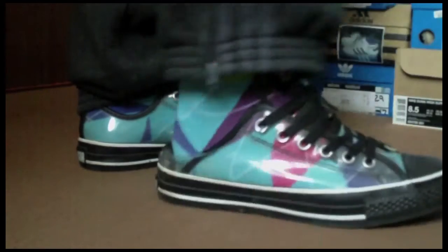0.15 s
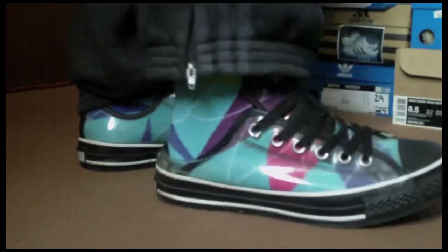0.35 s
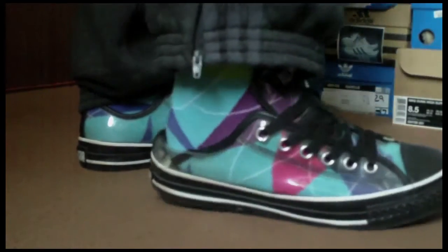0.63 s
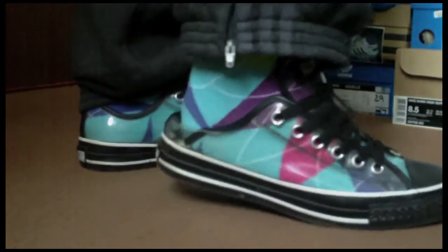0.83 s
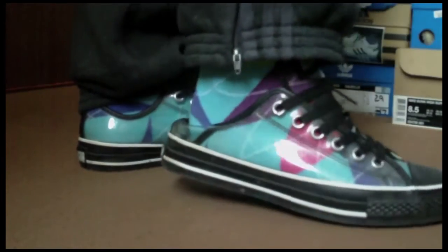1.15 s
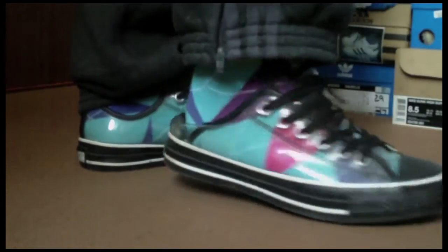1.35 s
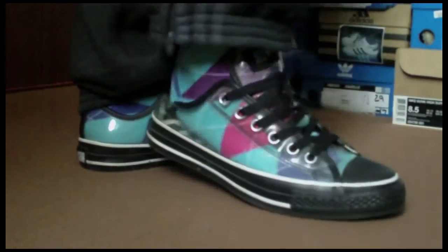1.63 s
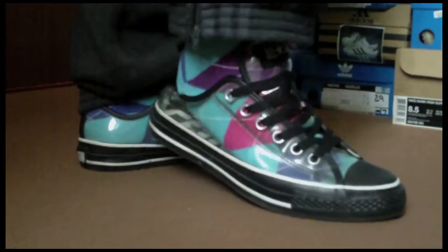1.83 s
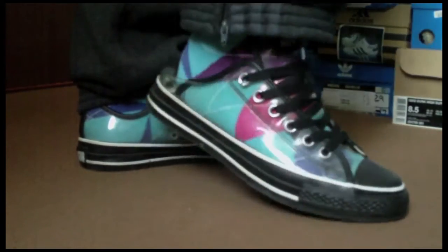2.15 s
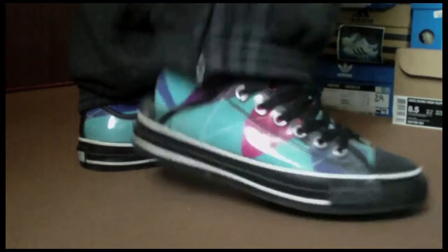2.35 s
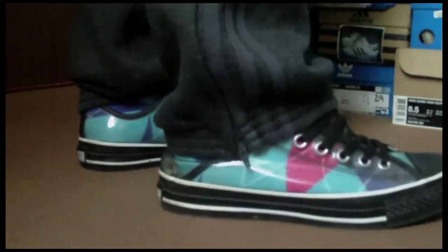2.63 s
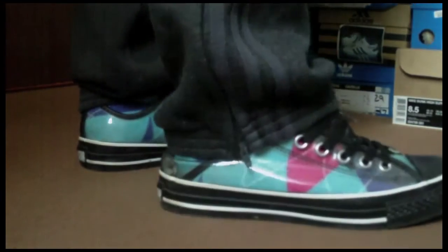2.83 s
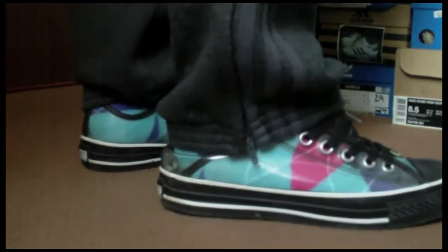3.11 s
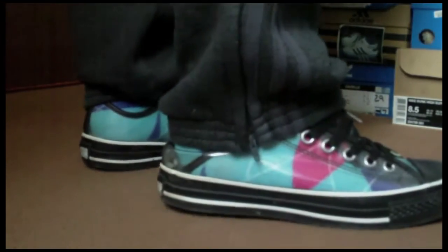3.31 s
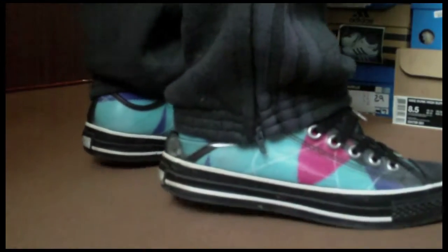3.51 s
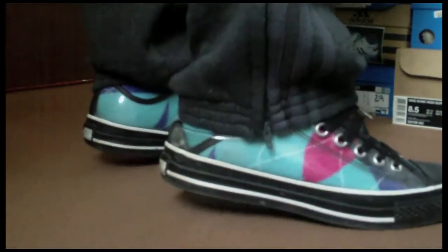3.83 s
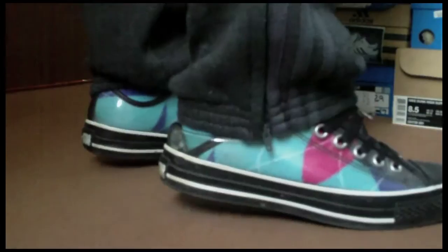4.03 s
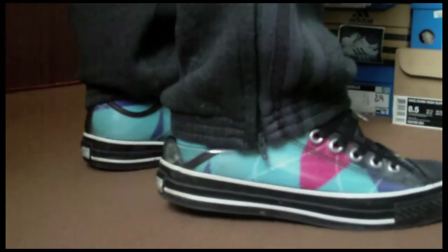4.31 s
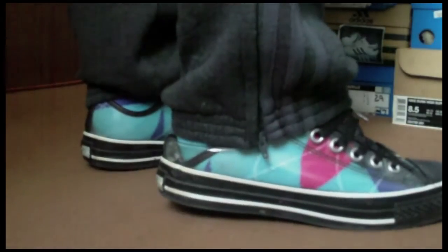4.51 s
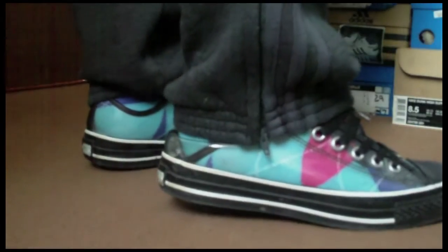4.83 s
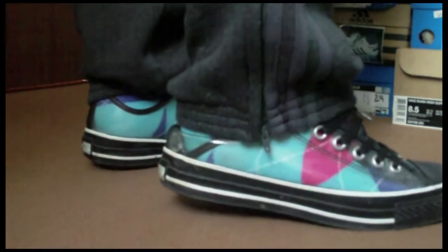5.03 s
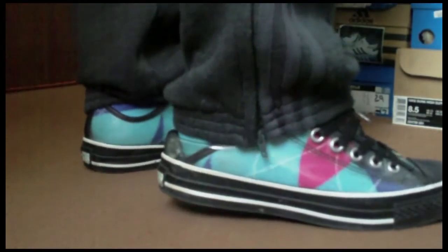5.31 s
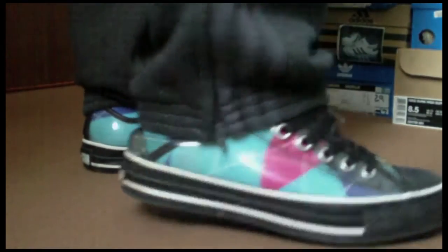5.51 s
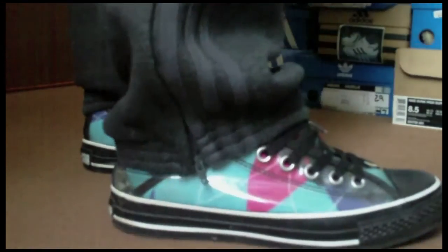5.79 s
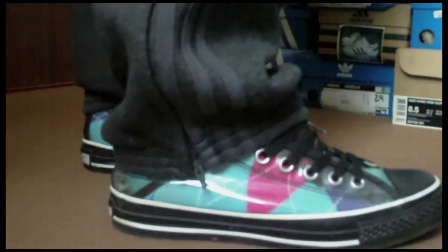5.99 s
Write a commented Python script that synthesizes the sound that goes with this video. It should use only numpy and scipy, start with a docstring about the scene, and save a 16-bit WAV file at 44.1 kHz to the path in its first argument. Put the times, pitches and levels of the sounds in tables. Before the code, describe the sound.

Sneaker soles creak, tap and scuff on a hard indoor floor, with one sharp knock midway, over faint hiss and cloth rustle.

```python
"""Soles tap, creak and scuff as feet in glossy sneakers shift on a hard indoor floor, close to a small camera.
Blows and stick-slip bursts ring modes of sole and floor board; dragging soles rub without a break.
A metal zip pull tinkles in thin tones, and a bird far outside chirps in short gliding whistles.
Under it lie shaped noise for room and trouser cloth, circuit hiss, two thin tones and a faint
regular camera tick. A short, dull echo follows the feet, zip and bird."""
import sys
import numpy as np
from scipy import signal
from scipy.fft import rfft, irfft
from scipy.io import wavfile
from scipy.ndimage import uniform_filter1d

SR = 44100
rng = np.random.default_rng(int(sys.argv[2]) if len(sys.argv) > 2 else 0)


def to_linear_factor(level_db):
    """Convert decibel levels (scalar or array-like) to linear amplitude factors."""
    exponent = np.asarray(level_db, float) / 20
    return 10 ** exponent


def master(y):
    """Save y as 16-bit WAV."""
    cut = np.clip(np.atleast_2d(y).T, -1, 1)
    pcm = np.round(cut * 32767)  # scale
    wavfile.write(sys.argv[1], SR, pcm.astype(np.int16))


N = 271656  # length in samples


def level(x, db):
    """Scale to an rms level."""
    return x * to_linear_factor(db) / np.sqrt(np.mean(x ** 2))


def to_peak(x, db):
    """Scale to a peak level."""
    return x * to_linear_factor(db) / np.max(np.abs(x))


def add(out, x, s):
    """Mix x into out from time s."""
    i = max(int(s * SR), 0)
    out[i:i + len(x)] += x[:len(out) - i]


def resonance(f, hz, width_hz):
    """Complex response of one mode, gain 1 at its centre."""
    return 1j * f * width_hz / (hz ** 2 - f ** 2 + 1j * f * width_hz)


def lowpass(f, hz):
    """Complex response of a two-pole low-pass."""
    return hz ** 2 / (hz ** 2 - f ** 2 + 1j * f * hz)


def coloured(points):
    """Noise shaped by a spectrum of (frequency [Hz], density [dB]) points."""
    hz, db = np.transpose(points)
    f = np.maximum(np.fft.rfftfreq(N, 1 / SR), 1)
    gain = to_linear_factor(np.interp(np.log(f), np.log(hz), db))
    return irfft(rfft(rng.standard_normal(N)) * gain, N)


def walk(rate):
    """Random values, one per 1 / rate s with a slew between them; spread a little below 1."""
    k = int(SR / rate)
    held = np.repeat(rng.standard_normal(N // k + 1), k)
    return uniform_filter1d(held, k)[:N]


def room():
    """Air and cloth noise whose level follows the movement and flutters."""
    # room noise and rustling cloth before the flutter: (time [s], rms level [dB])
    rustle = [(0.0, -60), (1.47, -61.5), (1.71, -57.5), (1.87, -61.5), (2.49, -58.5), (2.68, -60),
              (3.3, -59.5), (3.6, -60), (4.3, -60), (4.75, -60.5), (6.16, -61)]
    # shape of the noise spectrum: (frequency [Hz], relative density [dB per Hz])
    room_spectrum = [(18, -77), (30, -44), (64, -31.5), (148, -20.5), (236, -11), (420, -5), (479, -3.5),
                     (572, -2.5), (747, -3), (932, -1), (1020, -1), (1360, -4.5), (6000, -31.5),
                     (7800, -32.5), (13200, -120)]
    s, db = np.transpose(rustle)
    flutter_db = walk(14)
    return level(coloured(room_spectrum), 0) * to_linear_factor(np.interp(np.arange(N) / SR, s, db) + flutter_db)


def camera():
    """Circuit hiss, two thin tones and puffs of high noise at the ticks of two regular clocks."""
    # shape of the circuit hiss: (frequency [Hz], relative density [dB per Hz])
    hiss_spectrum = [(300, -15.5), (1500, 6), (4000, -1), (7000, -6.5), (11000, -8.5), (12500, -15.5),
                     (15000, -15)]
    # circuit tones: (frequency [Hz], rms level [dB])
    whine_tones = [(6594, -88.5), (12080, -100)]
    tick_period_s, clock_starts_s = 0.5, (0.33, 0.03)
    tick_db, tick_spread_db, tick_half_width_s = -77.5, 3, 0.009
    t, f = np.arange(N) / SR, np.fft.rfftfreq(N, 1 / SR)
    times = np.concatenate([np.arange(s, N / SR, tick_period_s) for s in clock_starts_s])
    dbs = tick_db + tick_spread_db * rng.standard_normal(len(times))
    gate = sum(to_linear_factor(db) * np.exp(-((t - s) / tick_half_width_s) ** 2) for s, db in zip(times, dbs))
    tick_band = resonance(f, 11250, 600) ** 2 + 0.71 * resonance(f, 9000, 5000) ** 2
    ticks = level(irfft(rfft(rng.standard_normal(N)) * tick_band, N), 0) * gate
    whine = sum(level(np.sin(2 * np.pi * hz * t), db) for hz, db in whine_tones)
    return level(coloured(hiss_spectrum), -66.5) + ticks + whine


def bird():
    """Short gliding whistles, blurred into a breathy band by distance."""
    # chirps before the blur:
    # (time [s], length [s], start frequency [Hz], end frequency [Hz], peak level [dB])
    chirps = [(1.067, .09, 4600, 4800, -72), (2.619, 0.088, 4400, 3600, -66),
              (4.184, 0.046, 4300, 3900, -61), (5.354, .05, 4400, 3800, -66), (5.417, .07, 3400, 3300, -67)]
    out = np.zeros(N)
    for s, length, start_hz, end_hz, db in chirps:
        u = np.linspace(0, 1, int(length * SR))
        phase = 2 * np.pi * np.cumsum(start_hz + (end_hz - start_hz) * u) / SR
        add(out, to_linear_factor(db) * np.sin(np.pi * u) * np.sin(phase), s)
    blur = 0.15 + walk(700)
    return out * blur


def zip_pull():
    """Thin metal tones of uneven level, held while the pull chatters, then ringing out."""
    # zip pull touching its slider, before the chatter:
    # (time [s], frequency [Hz], level [dB], held time [s])
    tinkles = [(3.176, 7200, -64, .02), (3.178, 11150, -70, 0.019), (3.178, 6600, -67, 0.017),
               (3.235, 6255, -62, 0.05), (3.299, 7100, -55, 0.0053), (3.298, 3900, -61, .01),
               (3.18, 9800, -74, .02), (3.31, 9900, -72, .02), (4.24, 10900, -75, 0.019),
               (4.46, 9230, -66.5, 0.066), (5.535, 7470, -71, 0.015)]
    rise_s, t60_s = 0.0039, 0.06
    out, t = np.zeros(N), np.arange(SR // 5) / SR
    for s, hz, db, held in tinkles:
        shape = (1 - np.exp(-t / rise_s)) * to_linear_factor(-60 * np.maximum(t - held, 0) / t60_s)
        chatter = 1 + 0.5 * walk(144)[:len(t)]
        add(out, to_linear_factor(db) * shape * chatter * np.sin(2 * np.pi * hz * t), s)
    return out


def ring(f, centre_hz, upper_db):
    """Response of the sole at one spot: low modes near its centre speak most, upper ones by hardness."""
    # sole modes before drift and scatter: (frequency [Hz], width [Hz], relative level [dB])
    sole_modes = [(578, 71, 6.5), (623, 74, 6.5), (721, 111, 4), (824, 69, 5.5), (899, 96, 2.5),
                  (1060, 80, 3), (1177, 74, 3), (1257, 102, 5), (1408, 56, 7), (1480, 87, 2),
                  (1555, 24, -6.5), (1975, 106, 2.5), (2004, 15, 14), (2144, 46, 2), (2410, 110, -2.5),
                  (2490, 120, -0.5), (2746, 205, 1), (2750, 210, 2), (3086, 34, 2), (3115, 310, -2),
                  (3600, 33, -1.5), (3900, 230, -9), (4000, 210, -24.5), (4500, 170, -6.5)]
    upper_hz, ring_octaves = 1950, 0.81
    mode_drift, mode_scatter_db = 0.044, 3.5  # drift as a share of the frequency
    hz, width_hz, db = np.transpose(sole_modes)
    scatter, drift = rng.standard_normal((len(hz), 2)).T
    gains = to_linear_factor(db + mode_scatter_db * scatter) * (-1) ** np.arange(len(hz))
    near = 1 / (1 + (np.log2(hz / centre_hz) / ring_octaves) ** 2) ** 2
    # flexing shifts the modes a little each time
    shifted_hz = hz * (1 + mode_drift * drift)
    modes = [g * resonance(f, h, w) for g, h, w in zip(gains, shifted_hz, width_hz)]
    # the damped rubber itself gives one broad, quick pulse
    rubber = to_linear_factor(-2.5) * resonance(f, centre_hz, 0.56 * centre_hz)
    low_modes = sum(m * n for m, n, h in zip(modes, near, hz) if h < upper_hz)
    body = (rubber + low_modes) * lowpass(f, 1930)
    rasp = resonance(f, 3140, 3000) ** 2
    upper = (rasp + sum(m for m, h in zip(modes, hz) if h > upper_hz)) * to_linear_factor(upper_db)
    # a small sole radiates little bass, and soft rubber little treble
    return (body + upper) * (1j * f / (1j * f + 340)) ** 2 * lowpass(f, 4540) ** 3


def slips(size):
    """Dense stick-slip clicks of uneven size."""
    uneven_db = 2.5 * np.minimum(rng.exponential(size=size), 4)
    return rng.standard_normal(size) * to_linear_factor(uneven_db)


def scrape():
    """Unbroken slips through the sole modes as a sole drags, fading and fluttering; modes shift at each grip."""
    # soles dragging, before the flutter:
    # (time [s], length [s], start rms level [dB], end rms level [dB], centre of the ring [Hz])
    drags = [(3.191, 0.1, -40.5, -45, 1400), (3.301, 0.16, -45.5, -63.5, 1400),
             (3.487, 0.18, -35, -65.5, 1240), (4.052, 0.073, -53.5, -68, 1320),
             (4.283, 0.179, -46.5, -56, 1070), (4.487, 0.11, -40.5, -57.5, 1330)]
    piece_s = 0.03  # pieces overlap by half, so a new grip comes every 15 ms
    size = 2 * int(piece_s * SR)
    out, f = np.zeros(N), np.fft.rfftfreq(size, 1 / SR)
    window = np.hanning(size // 2)
    for s, length, start_db, end_db, ring_hz in drags:
        for u in np.arange(0, length, piece_s / 2):
            rub = irfft(rfft(slips(size)) * ring(f, ring_hz, -22.5))
            rub = level(rub, start_db + (end_db - start_db) * u / length)
            ending = min(1, (length - u) * 2 / piece_s)
            add(out, rub[:size // 2] * window * ending, s + u - piece_s / 4)
    return out * to_linear_factor(2.4 * walk(90))


def burst(t60):
    """Quick rise and fading tail of one contact."""
    t = np.arange(8192) / SR
    rise_s = 0.0025
    return (1 - np.exp(-t / rise_s)) * to_linear_factor(-60 * t / max(t60, 0.004))


def scuff(shape):
    """A broad, high hiss: noise under the given envelope through a wide resonance."""
    f = np.fft.rfftfreq(len(shape), 1 / SR)
    noise = shape * rng.standard_normal(len(shape))
    return irfft(rfft(noise) * resonance(f, 5850, 5500) ** 3)


def contact(peak_db, ring_hz, upper_db, board_db, thump_db, blow_db, t60):
    """A blow and a fading burst of slips ring the sole and the board, thump the floor and scuff."""
    # floor board: (frequency [Hz], width [Hz], relative level [dB])
    board_modes = [(263, 44, -21.5), (326, 25, -11.5), (458, 21, 4.5)]
    blow_s = 0.001482
    shape = burst(t60)
    size = len(shape)
    f = np.fft.rfftfreq(size, 1 / SR)
    blow = to_linear_factor(blow_db) * (np.arange(size) == int(blow_s * SR))
    push = rfft(shape * slips(size) + blow)
    body = irfft(push * ring(f, ring_hz, upper_db))
    board_ring = sum(to_linear_factor(db) * resonance(f, hz, width_hz) for hz, width_hz, db in board_modes)
    board = irfft(push * board_ring * lowpass(f, 510) * 1j * f / (1j * f + 300))
    thump = irfft(push * resonance(f, 65, 116))
    # harder contacts hiss relatively less
    scuff_db = -32 - 0.5 * (peak_db + 35)
    tap = level(body, 0) + level(board, board_db)
    tap = tap + level(thump, thump_db) + level(scuff(shape), scuff_db)
    return to_peak(tap, peak_db)


def upper_scuffs():
    """Bright scuffs of the glossy upper: bursts of high hiss alone."""
    # (time [s], peak level [dB], fade t60 [s])
    scuffs = [(0.429, -61, 0.06), (0.619, -56, 0.13), (1.519, -44, 0.056), (4.456, -47.5, 0.14),
              (4.497, -54, 0.085), (5.86, -63, 0.07)]
    out = np.zeros(N)
    for s, peak_db, t60 in scuffs:
        add(out, to_peak(scuff(burst(t60)), peak_db), s)
    return out


def creaks():
    """Creaks of the flexing sole, mostly slips."""
    # (time [s], peak level [dB], centre of the ring [Hz], gain of upper modes [dB], slips fade t60 [s])
    creak_events = [(0.429, -44, 1480, -12, 0.048), (0.618, -48, 1370, -7, 0.077),
                    (0.632, -42.5, 1380, -14, 0.063), (0.682, -47, 530, -31, 0.029),
                    (1.52, -29.5, 1260, -11.5, 0.031), (1.533, -36.5, 900, -16, 0.045),
                    (1.608, -50, 650, -21, 0.062), (1.639, -47.5, 700, -21, 0.045),
                    (1.879, -39.5, 686, -32, 0.027), (2.305, -48, 870, -15.5, 0.18),
                    (3.17, -24.5, 1350, -6, 0.08), (3.203, -33, 1510, -16, 0.064),
                    (3.233, -25, 1340, -18, 0.11), (3.297, -26, 1660, -14.5, 0.077),
                    (3.372, -35.5, 1370, -32, 0.056), (3.446, -11, 1220, -23.5, 0.054),
                    (3.468, -23, 1060, -17, 0.06), (3.532, -30.5, 1340, -30, 0.089),
                    (3.575, -33.5, 1290, -31, 0.023), (3.655, -51, 875, -16.5, 0.07),
                    (3.864, -41, 870, -24, 0.062), (3.888, -39.5, 774, -40, 0.034),
                    (4.003, -42.5, 794, -31, 0.054), (4.016, -44, 700, -27, 0.04),
                    (4.037, -31.5, 1310, -23, 0.045), (4.05, -33, 1340, -37, 0.033),
                    (4.229, -32, 1380, -12, 0.048), (4.241, -35.5, 1230, -15, 0.099),
                    (4.42, -47, 1360, -7, 0.038), (4.457, -27, 845, -12.5, 0.15),
                    (4.497, -32.5, 1480, -15, 0.13), (5.472, -48.5, 1090, -9, 0.078),
                    (5.86, -42.5, 1200, -13.5, 0.075), (5.99, -52.5, 1500, -7, 0.13)]
    out = np.zeros(N)
    for s, peak_db, ring_hz, upper_db, t60 in creak_events:
        creak = contact(peak_db, ring_hz, upper_db, board_db=-28, thump_db=-41, blow_db=14, t60=t60)
        add(out, creak, s)
    return out


def knocks():
    """Heel and toe knocks: mostly one blow and its two weaker bounces."""
    # (time [s], first peak level [dB], centre of the ring [Hz], gain of upper modes [dB],
    #  board level against the sole [dB])
    knock_events = [(1.507, -20.5, 910, -26, -6), (1.848, -28, 820, -27, -13),
                    (1.861, -25.5, 1200, -23, -18.5), (3.452, -6.5, 810, -19.5, -35),
                    (3.483, -20.5, 1130, -34, -31), (3.901, -42.5, 640, -36, -32),
                    (4.462, -25.5, 824, -14.5, -24), (4.476, -27, 880, -10.5, -28)]
    bounce_s, bounce_db = 0.005, -5  # step from each blow to the next
    out = np.zeros(N)
    for s, peak_db, ring_hz, upper_db, board_db in knock_events:
        for k in range(3):
            knock = contact(peak_db + k * bounce_db, ring_hz, upper_db, board_db,
                            thump_db=-38, blow_db=32.5, t60=0.014)
            add(out, knock, s + k * bounce_s)
    return out


def echo(x):
    """A small furnished room: a short, dull, diffuse tail."""
    t60_s, rise_s, top_hz, echo_db = 0.14, 0.0067, 2960, -16.5
    t = np.arange(SR // 2) / SR
    tail = rng.standard_normal(len(t)) * to_linear_factor(-60 * t / t60_s) * (1 - np.exp(-t / rise_s))
    tail = signal.lfilter(*signal.butter(1, top_hz, fs=SR), tail)
    tail = tail / np.sqrt(np.sum(tail ** 2))
    return signal.fftconvolve(x, tail)[:N] * to_linear_factor(echo_db)


def scene():
    """Near sounds and the bird with their echo over the steady noise."""
    feet = creaks() + knocks() + upper_scuffs() + scrape()
    echoing = feet + zip_pull() + bird()
    return (echoing + echo(echoing) + room() + camera())[None]


def top_cut(x):
    """Nothing passes above the cut-off."""
    return signal.sosfilt(signal.butter(12, 15160, fs=SR, output="sos"), x)


def record(dry):
    """Two narrow dips from the microphone housing and a closed top."""
    # dips: (frequency [Hz], width [Hz], gain at the centre [dB])
    housing_dips = [(7850, 130, -11), (11920, 150, -14)]
    top_hz = 15050
    f = np.fft.rfftfreq(N, 1 / SR)
    dips_db = sum(db * np.exp(-((f - hz) / width_hz * 2) ** 2) for hz, width_hz, db in housing_dips)
    mix = irfft(rfft(dry) * to_linear_factor(dips_db) * (f < top_hz), N)
    return top_cut(mix)


dry = scene()
out = record(dry)
master(out)
```